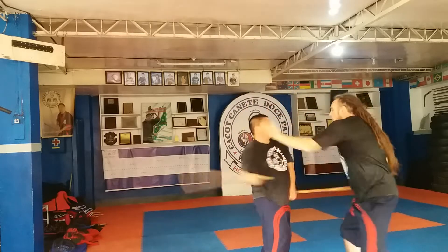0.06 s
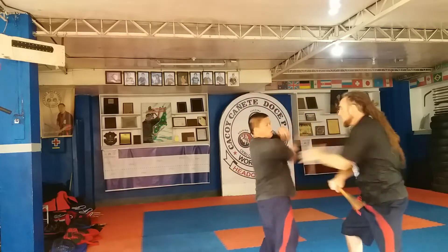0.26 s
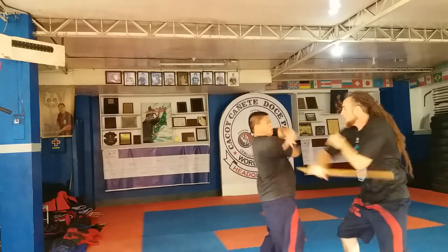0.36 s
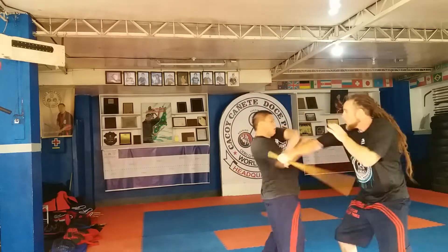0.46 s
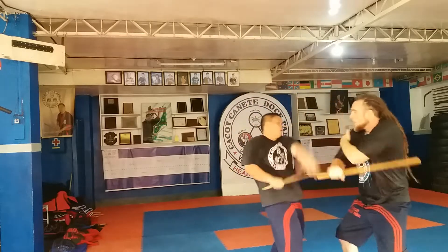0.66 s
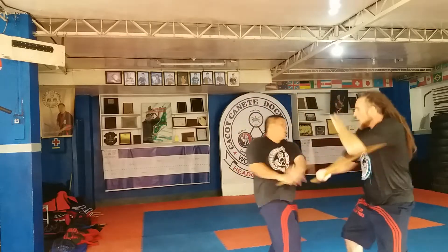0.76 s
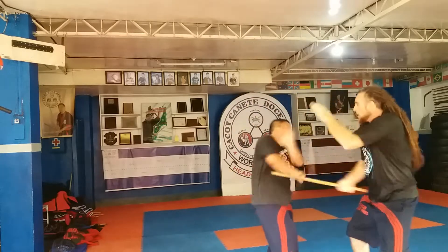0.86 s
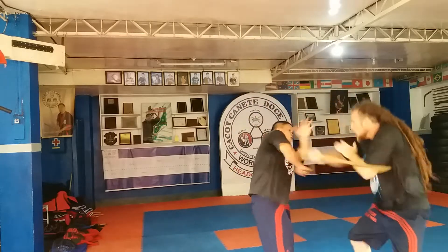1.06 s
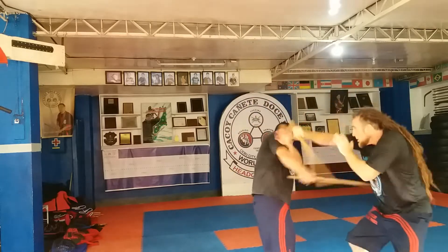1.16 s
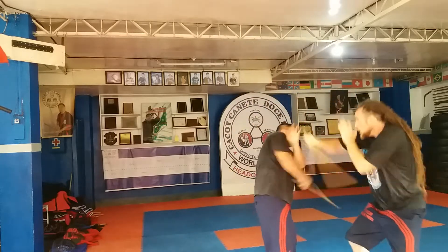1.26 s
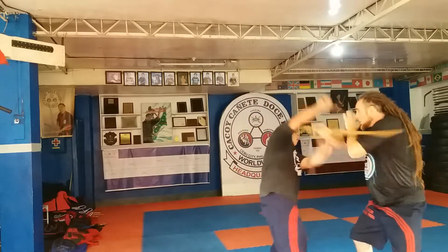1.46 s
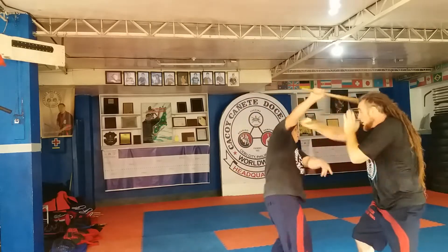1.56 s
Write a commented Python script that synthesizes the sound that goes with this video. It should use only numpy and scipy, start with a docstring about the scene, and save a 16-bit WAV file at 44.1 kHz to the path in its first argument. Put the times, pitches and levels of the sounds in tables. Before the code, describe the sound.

Wooden sticks strike twice during sparring in a reverberant gym. A faint footfall, swishing clothes and a light slap open the scene. At about 0.2 seconds comes one hard, sharp crack that rings through the hall. Soft arm slaps and rustles follow between 0.5 and 1 second, then a duller stick knock at 1.2 seconds. Quick slaps land at 1.5 seconds as a faint low hum grows over steady room noise.

```python
"""Two people spar with wooden sticks on the mats of a reverberant gym, heard on a stereo recorder.
Over room noise, a low footfall thump dies away, clothes swish and a light slap lands. At 0.23 s stick
meets stick in one hard, chattering crack that rings through the hall. Lighter slaps of hands and arms
follow, then a duller knock on a tightly gripped stick at 1.2 s, and quick slaps at 1.5 s as a low hum
grows. The recorder's limiter ducks around the loudest peaks."""
import sys
import numpy as np
from scipy import signal
from scipy.fft import rfft, irfft
from scipy.io import wavfile
from scipy.ndimage import uniform_filter1d, minimum_filter1d

SR = 44100
rng = np.random.default_rng(int(sys.argv[2]) if len(sys.argv) > 2 else 0)


def int16_out(signal):
    """Quantize to a 16-bit WAV file."""
    q = np.round(np.clip(np.atleast_2d(signal).T, -1, 1) * 32767)
    wavfile.write(sys.argv[1], SR, q.astype(np.int16))


N = 70560

# How alike room noise and swishes are at the two microphones. Each row: frequency in Hz, correlation.
ROOM_LIKENESS = [(40, 1), (130, 0.92), (300, 0.83), (800, 0.21), (16000, 0)]


def amp(db):
    """Decibels to gain."""
    return 10 ** (np.asarray(db) / 20)


def burst(x):
    """Scales to the energy of 10 ms at rms 1."""
    return x * np.sqrt(SR / 100 / (np.sum(x ** 2) + 1e-20))


def read(points, hz):
    """Reads a spectrum on a log-frequency axis."""
    f, value = np.transpose(points)
    return np.interp(np.log(hz + 1), np.log(f + 1), value)


def add(mix, start_s, sound):
    """Adds a sound to the mix, dropping whatever falls outside it."""
    at = round(start_s * SR)
    sound = sound[:, max(-at, 0):]
    part = mix[:, max(at, 0):][:, :sound.shape[1]]
    part += sound[:, :part.shape[1]]


def coloured(x, gain_db, size=2048):
    """Minimum-phase filter; gain_db gives dB as a function of Hz."""
    log_gain = np.log(amp(gain_db(abs(np.fft.fftfreq(size, 1 / SR)))))
    impulse = np.fft.ifft(np.exp(np.conj(signal.hilbert(log_gain)))).real
    return signal.fftconvolve(x, impulse)[:len(x)]


def stereo_noise(size, likeness, colour=None):
    """Two channels of noise at rms 1, with a left-right correlation set by frequency."""
    hz = np.fft.rfftfreq(size, 1 / SR)
    a, b = rfft(rng.standard_normal((2, size)))
    same = np.clip(read(likeness, hz), -1, 1)
    mid, side = a * np.sqrt(1 + same), b * np.sqrt(1 - same)
    gain = amp(read(colour, hz)) if colour else 1
    noise = irfft(np.array([mid + side, mid - side]) * gain, size)
    return noise / np.sqrt(np.mean(noise ** 2) + 1e-20)


def grit(decay_s, size, bite=0, bite_s=0.00037):
    """Contact noise: a dying burst with an even spectrum; bite sharpens its first instant."""
    t = np.arange(size) / SR
    envelope = np.exp(-t / decay_s) + bite * np.exp(-t / bite_s)
    bound = 2 * envelope / np.linalg.norm(envelope)
    x = envelope * rng.standard_normal(size)
    for _ in range(6):
        whitened = irfft(np.exp(1j * np.angle(rfft(x))), size)
        x = np.clip(whitened, -bound, bound)
    return burst(x)


def footfall_and_hum(hz=65, octave_db=-60):
    """A low footfall thump dies away at the start; a low hum grows towards the end."""
    # The fundamental's level, first thump, then hum. Each row: time in seconds, rms level in dB.
    levels = [(0, -52), (.4, -67), (1.0, -60), (1.25, -56.5), (1.4, -49.5), (1.6, -49.5)]
    t = np.arange(N) / SR
    phase = 2 * np.pi * (hz * t + rng.random())
    level = amp(np.interp(t, *np.transpose(levels)))
    return np.sqrt(2) * (level * np.sin(phase) + amp(octave_db) * np.sin(2 * phase))


def room_noise(rms_db=-49.5):
    """The gym's steady, bass-heavy noise, all around the microphones."""
    # Its spectrum. Each row: frequency in Hz, relative density in dB.
    colour = [(15, -37), (30, -28), (60, -7.5), (120, 2.5), (170, -10.5), (280, -5), (450, -12),
              (900, -16.5), (2000, -19), (3200, -24.5), (6000, -36.5), (15000, -36.5)]
    return amp(rms_db) * stereo_noise(N, ROOM_LIKENESS, colour)


def swishes():
    """Cloth and feet rub in soft swells as the fighters move."""
    # The movements. Each row: middle in seconds, width in seconds, level in dB.
    moves = [(.02, .06, -43), (.195, .011, -40), (.49, 0.023, -46), (.75, 0.045, -56.5), (.98, 0.052, -53),
             (1.47, 0.034, -47.5)]
    # The rubbing's spectrum. Each row: frequency in Hz, relative density in dB.
    colour = [(60, -7), (300, 0.5), (1000, -3.5), (2000, -6.5), (5000, -17.5), (12000, -21), (16000, -24)]
    t = np.arange(N) / SR
    level = sum(amp(db) * np.exp(-((t - middle) / width) ** 2 / 2) for middle, width, db in moves)
    return level * stereo_noise(N, ROOM_LIKENESS, colour)


def slaps(thud_hz=300, smack_hz=3700, air_hz=13000):
    """Hands and arms meet in short puffs with no ring: low thud, smack and airy top."""
    # The contacts. Each row: start in seconds, level in dB, decay in seconds, then thud, smack, air,
    # left over right and hall send, all in dB.
    contacts = [(-.001, -29, 0.0069, -0.5, 5.5, -4, 0.5, -2), (.468, -43.5, .013, -4, -2, 2, 0, 1),
                (.686, -44.5, .005, -3.5, -4, -10, 0, 1.5), (.751, -47, .005, -4, -3.5, -3, 0, -2),
                (1.016, -50.5, .008, -5, -3, 1, 3, 1), (1.034, -44, .008, -9, 0.5, -9, 0, -1),
                (1.5012, -39.5, .0015, 1, 0, 7, 0, 0), (1.5046, -32.5, .0002, 2.5, 1, 10, 3, -2),
                (1.518, -36, .002, 9, 5, -1, 0, -3)]
    # The spectrum they share. Each row: frequency in Hz, relative density in dB.
    base_colour = [(50, -11.5), (150, 1.5), (350, 2), (700, -2.5), (1800, 0), (2700, -3.5), (4100, -2.5),
                   (5200, -10), (7000, -11.5), (8500, -9), (13000, -7.5), (16000, -12.5)]
    out = np.zeros((2, N))
    for start_s, db, decay_s, thud_db, smack_db, air_db, pan_db, room_db in contacts:
        def colour(hz):
            bump = lambda centre, octaves: np.exp(-(np.log2((hz + 1) / centre) / octaves) ** 2)
            return (read(base_colour, hz) + thud_db * bump(thud_hz, 1.5)
                    + smack_db * bump(smack_hz, 0.62) + air_db * bump(air_hz, 0.88))
        puff = amp(db) * burst(coloured(grit(decay_s, size=8192), colour))
        add(out, start_s, in_gym(puff, room_db, pan_db))
    return out


def struck_stick(modes, noise_colour, noise_db, low_cut_hz, chatter=(), size=8192):
    """A sharp contact with splintery noise rings the wood's modes; each chatter touches another spot."""
    t = np.arange(size) / SR
    waves = np.array([amp(db - 60 * t / t60) * np.sin(2 * np.pi * hz * t) for hz, db, t60 in modes])
    low_cut = signal.butter(2, low_cut_hz, "high", fs=SR, output="sos")

    def contact(mode_signs, noise_decay_s, bite=0):
        ring = burst(signal.sosfilt(low_cut, mode_signs @ waves))
        splinter = burst(coloured(grit(noise_decay_s, size, bite), lambda hz: read(noise_colour, hz)))
        return ring + amp(noise_db) * splinter

    signs = (-1) ** (np.arange(len(modes)) // 3)
    sound = contact(signs, noise_decay_s=0.004, bite=amp(8))
    for delay_s, db in chatter:
        rebound = contact(rng.choice([-1, 1], len(modes)), noise_decay_s=0.00104)
        add(sound[None], delay_s, amp(db) * rebound[None])
    return sound


def hard_crack():
    """Stick hits stick, and the two chatter against each other."""
    # The wood's modes. Each row: frequency in Hz, relative level in dB, T60 in seconds.
    modes = [(351.5, -10, 0.039), (536, -7.5, 0.031), (614.4, 1, .055), (755, 1, .025), (900, -8, .025),
             (1070, -7, .025), (1263, 0, .025), (1378, -2.5, 0.021), (1523, -1.5, 0.023), (1748, -3, .018),
             (1973, -3, 0.021), (2220, -4, 0.017), (3040, -13, 0.03), (3400, -11.5, 0.021),
             (4034, -8.5, 0.015)]
    # The splintery noise. Each row: frequency in Hz, relative density in dB.
    noise_colour = [(30, -29), (120, -15), (260, -7.5), (600, 1.5), (2000, 2), (2700, -6), (4200, -6.5),
                    (6500, -11), (9000, -10), (12500, -9.5), (16000, -14.5)]
    # The rebounds. Each row: delay in seconds, level in dB against the first contact.
    chatter = [(.0035, -1), (.0085, -1.5), (.0130, -1.5)]
    blow = struck_stick(modes, noise_colour, noise_db=-7, low_cut_hz=380, chatter=chatter)
    return in_gym(amp(-12.4) * blow, room_db=-0.6, pan_db=0.94, tail_db_per_octave=-0.3)


def dull_knock():
    """A single blow on a tightly gripped stick."""
    # The gripped wood's modes. Each row: frequency in Hz, relative level in dB, T60 in seconds.
    modes = [(263.5, -13.5, 0.066), (495, -1, .02), (608, -2, .012), (753, -3, .04), (894, -1, .015),
             (997, -5.5, 0.019), (1270, -7.5, 0.013), (1530, -18, 0.013), (1890, -12, .018),
             (2370, -9, 0.015)]
    # The splintery noise. Each row: frequency in Hz, relative density in dB.
    noise_colour = [(30, -26), (150, 0), (800, 3), (1500, 5), (2600, 4), (4400, 0), (6500, -6), (8500, -7),
                    (13000, -7), (16000, -10)]
    blow = struck_stick(modes, noise_colour, noise_db=-10, low_cut_hz=200)
    return in_gym(amp(-19.8) * blow, room_db=-0.2, pan_db=1.5, tail_db_per_octave=1.3)


def hall_tail(gap_s=0.0034, build_s=0.018):
    """Diffuse sound builds up in the hall, then dies at its own speed in each band."""
    # The hall's decay. Each row: frequency in Hz, T60 in seconds.
    decay = [(100, .6), (250, .55), (550, 0.49), (1400, 0.55), (3700, 0.55), (9000, 0.52), (16000, 0.47)]
    # How alike the tail is at the two microphones. Each row: frequency in Hz, correlation.
    likeness = [(60, .95), (250, 0.91), (550, 0.53), (1100, 0), (16000, 0.031)]
    hz, t, bands = signal.stft(stereo_noise(SR, likeness), SR, nperseg=256)
    tail = signal.istft(bands * amp(-60 * t / read(decay, hz)[:, None]), SR, nperseg=256)[1]
    age = np.maximum(np.arange(tail.shape[1]) / SR - gap_s, 0)
    tail = tail * (1 - np.exp(-age / build_s))
    return tail / np.sqrt(np.sum(tail ** 2) / 2)


def in_gym(sound, room_db, pan_db, tail_db_per_octave=0, left_lag_s=0.00007):
    """A blow reaches the microphones directly, by reflection, and as a tail with its broad colour."""
    # Reflections off floor and low ceiling. Each row: left and right delay in seconds, level in dB.
    echoes = [(.0046, 0.0045, -6), (.0078, .0086, -11), (0.0102, .0122, -8.5), (.0142, .0147, -12),
              (.0194, 0.019, -13.5)]
    # The hall's own colour. Each row: frequency in Hz, gain in dB.
    hall_colour = [(100, -1.5), (250, -0.5), (500, -2), (750, 0.5), (1500, 1), (4000, 2.5), (9000, 2.5),
                   (16000, 1)]
    hz = np.fft.rfftfreq(len(sound), 1 / SR)
    bands = np.geomspace(30, SR / 2, 1200)
    power = uniform_filter1d(np.interp(bands, hz, abs(rfft(sound)) ** 2), size=30)
    tail_db = 10 * np.log10(abs(power) + 1e-12) + read(hall_colour, bands) + room_db
    tail_db += tail_db_per_octave * np.log2(bands / 800)
    out = np.array([coloured(side, lambda f: np.interp(f, bands, tail_db)) for side in hall_tail()])
    direct = (left_lag_s, 0, 0)
    for left_s, right_s, db in [direct] + echoes:
        add(out[:1], left_s, amp(db) * sound[None])
        add(out[1:], right_s, amp(db) * sound[None])
    return out * amp([[pan_db / 2], [-pan_db / 2]])


def scene():
    """Two stick blows and light slaps over movement, room noise and hum."""
    mix = footfall_and_hum() + room_noise() + swishes()
    add(mix, 0.2305, hard_crack())
    add(mix, 1.1981, dull_knock())
    return mix + slaps()


def limiter(x, threshold_db=1, lookahead_s=0.022, attack_s=0.005, recover_db_per_s=200):
    """The recorder turns both channels down just ahead of a peak, then steadily recovers."""
    over_db = np.maximum(20 * np.log10(abs(x).max(0) + 1e-9) - threshold_db, 0)
    ahead = round(lookahead_s * SR)
    coming_db = -minimum_filter1d(-over_db, ahead, origin=-(ahead // 2))
    recovery_db = np.arange(N) * recover_db_per_s / SR
    held_db = np.maximum.accumulate(coming_db + recovery_db) - recovery_db
    duck_db = uniform_filter1d(held_db, round(attack_s * SR))
    return x * amp(-duck_db)


def record(dry, ceiling=0.93, top_hz=15950):
    """The microphone pair feeds the limiter, a soft ceiling and a steep treble cut."""
    # The balance of the microphones. Each row: frequency in Hz, left over right in dB.
    mic_balance = [(100, 0), (1000, 0), (2000, .8), (4000, -2), (8000, 4.5), (13000, .8)]
    tilt_db = read(mic_balance, np.fft.rfftfreq(2 * N, 1 / SR)) / 2
    picked_up = irfft(rfft(dry, 2 * N) * amp([tilt_db, -tilt_db]))[:, :N]
    limited = limiter(picked_up)
    rounded = limited / (1 + (limited / ceiling) ** 8) ** (1 / 8)
    low_pass = signal.firwin(511, top_hz, window=("kaiser", 9), fs=SR)
    return signal.oaconvolve(rounded, low_pass[None], "same")


dry = scene()
out = record(dry)
int16_out(out)
```